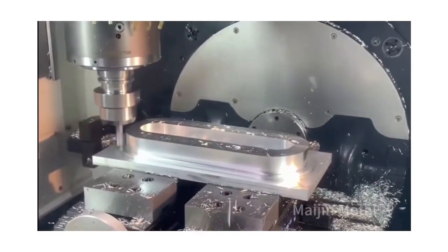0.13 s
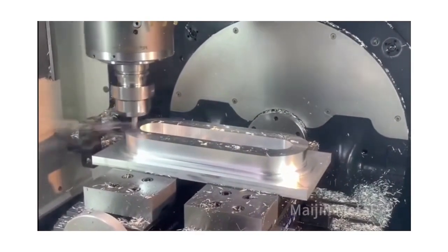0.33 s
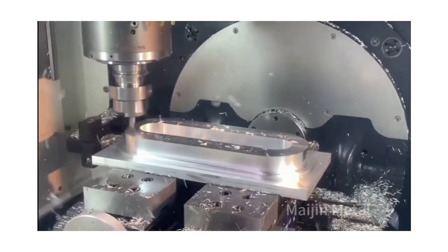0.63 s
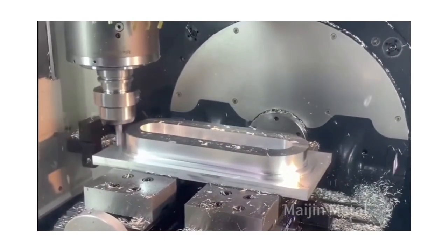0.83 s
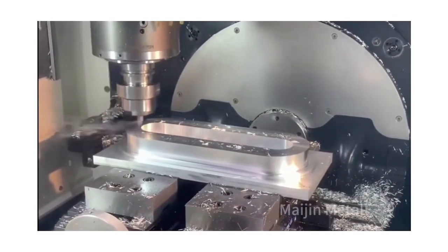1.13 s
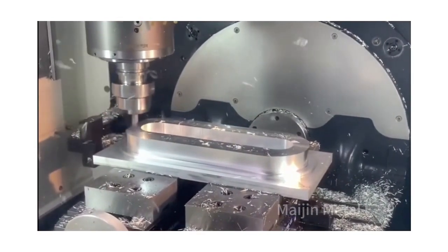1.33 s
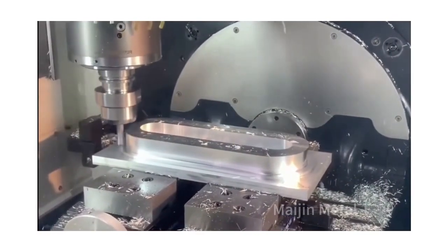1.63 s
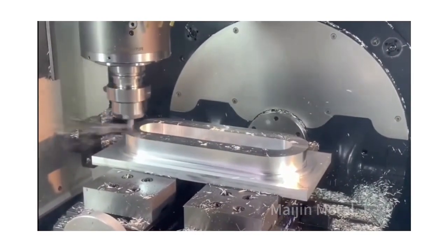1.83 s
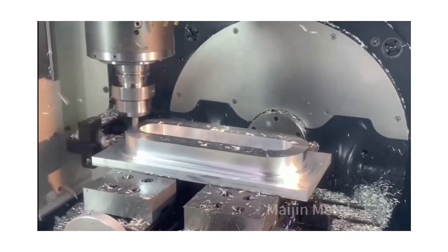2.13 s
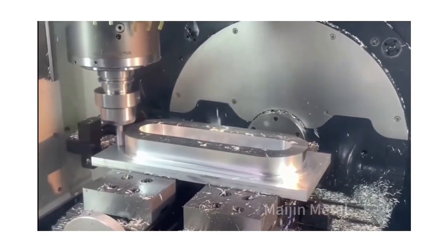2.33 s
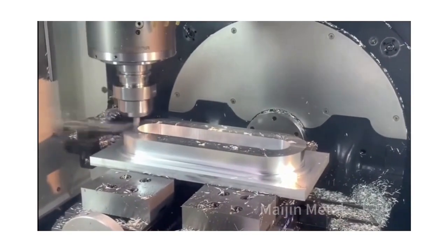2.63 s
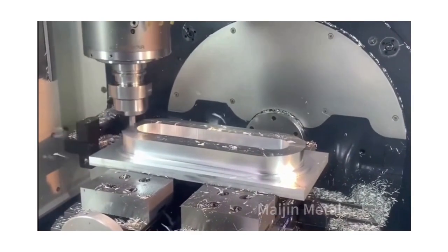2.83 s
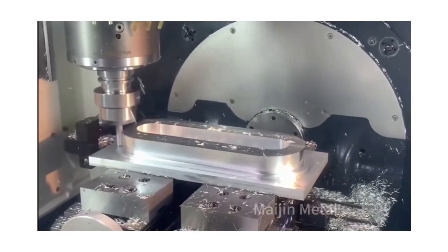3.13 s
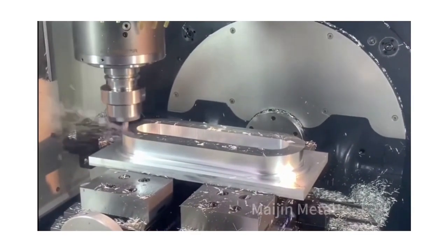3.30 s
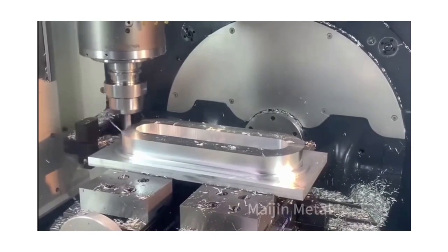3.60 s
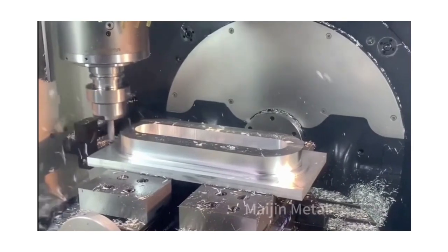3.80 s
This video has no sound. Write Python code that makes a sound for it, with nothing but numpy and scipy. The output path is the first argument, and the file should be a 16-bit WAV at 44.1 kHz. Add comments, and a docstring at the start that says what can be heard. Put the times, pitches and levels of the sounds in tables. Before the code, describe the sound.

A milling cutter makes six short, evenly spaced cuts in an aluminium block, each a high singing tone with a hissing spray of chips. Close by, the spindle hums, air hisses and the machine's enclosure rumbles throughout.

```python
"""At a milling machine's enclosure, a cutter takes six short passes through an aluminium block.
The cabinet rumbles, air hisses, and the spindle (the shaft that spins the cutter) hums. In each pass
the cutter sings on a multiple of the spindle's tone, drags the speed down a little and throws a spray
of metal chips. The drives that move the tool whine, and light chips patter on the walls."""
import sys
import numpy as np
from scipy import signal
from scipy.fft import rfft, irfft, next_fast_len
from scipy.io import wavfile
from scipy.ndimage import uniform_filter1d, map_coordinates

SR = 44100
rng = np.random.default_rng(int(sys.argv[2]) if len(sys.argv) > 2 else 0)


def dump_mix(stems):
    """Bounce the given channels to the path in sys.argv[1] as a 16-bit WAV at rate SR."""
    frames = np.atleast_2d(stems).T  # one column per channel
    limited = np.clip(frames, -1, 1)  # hard clip at full scale
    pcm = np.round(limited * 32767).astype(np.int16)
    wavfile.write(sys.argv[1], SR, pcm)


N = 174636
SPINDLE_HZ = 326.65
# The six passes: (middle [s], singing [dB], length [factor], first touch [dB], leaving ring [dB],
# squeal [dB], change in drive whine [dB])
PASSES = [(.036, -18, 1.06, -50, -37.5, -47, 8), (0.808, -19.7, 1.27, -40, -39, -45, -3.5),
          (1.585, -19.5, 0.995, -35, -43, -43.5, 3), (2.364, -20.3, 1.0, -58, -45, -38.5, 4),
          (3.104, -20.5, 0.9, -63, -42.5, -38, -4), (3.85, -21, 0.89, -50, -43, -37, 3)]


def amp(db):
    """Turn decibels into a gain."""
    return 10 ** (np.asarray(db) / 20)


def unit(x):
    """Scale a signal to an average (rms) strength of 1."""
    return x / np.sqrt(np.mean(x ** 2) + 1e-20)


def along(points, hz):
    """Read between (frequency, value) points on a logarithmic frequency scale."""
    freqs, values = np.transpose(points)
    return np.interp(np.log(hz + 1), np.log(freqs + 1), values)


def clock():
    """The time of each sample in seconds."""
    return np.arange(N) / SR


def swell(middle_s, width_s, steep=2):
    """A bell-shaped rise and fall; a steeper one has a flatter top and ends sooner."""
    return np.exp(-np.abs((clock() - middle_s) / width_s) ** steep)


def wobble(per_s):
    """A smooth curve through per_s random values a second."""
    return map_coordinates(rng.standard_normal(1024), [clock() * per_s], mode="wrap")


def filtered(x, response):
    """Give each frequency in x the gain that response sets for it."""
    size = next_fast_len(N + SR // 2)
    return irfft(rfft(x, size) * response(np.fft.rfftfreq(size, 1 / SR)), size)[..., :N]


def stereo(pair, spectrum):
    """Shape two unrelated signals and mix them to stereo: centred bass, wider treble."""
    # How alike left and right are: (frequency [Hz], likeness [0-1])
    likeness = [(3000, 1), (5500, 1), (8000, 1), (12000, 0.38), (15000, 0.4)]
    angle = lambda hz: np.arccos(np.clip(along(likeness, hz), -1, 1)) / 2
    response = lambda hz: amp(along(spectrum, hz)) * [np.cos(angle(hz)), np.sin(angle(hz))]
    mid, side = filtered(pair, response)
    return unit(np.array([mid + side, mid - side]))


def resonance(hz, width_hz):
    """Noise that rings around one pitch."""
    return unit(filtered(rng.standard_normal(N), lambda f: 1 / (1 + ((f - hz) / width_hz) ** 2)))


def tone(cycles, flutter_db):
    """A sine wave that follows a running count of cycles, fluttering in level and phase."""
    flutter = lambda: 0.87 * wobble(14) + 1.03 * wobble(60)
    unsteady = 1 + np.log(amp(flutter_db)) * (flutter() + 1j * flutter())
    return unit(np.real(unsteady * np.exp(2j * np.pi * (cycles + rng.random()))))


def cabinet():
    """The cabinet rumbles, and its panels boom at their own pitches."""
    # The rumble's colour: (frequency [Hz], relative level [dB])
    spectrum = [(15, -24), (26, -8), (45, .5), (75, -1), (92, -3), (125, 0), (160, -2), (190, .5),
                (220, -6.5), (255, -9.5), (300, -7.5), (345, -9), (400, -14), (480, -15.5), (580, -15.5),
                (750, -23), (1000, -25.5), (1500, -50), (3000, -75)]
    # Panel resonances: (pitch [Hz], half width [Hz], level [dB])
    panels = [(26, 4, -45), (41.2, 2.2, -36), (62.3, 7.2, -35.5), (345.4, 4, -46), (383.4, 4.6, -52.5),
              (814, 25, -57)]
    rumble = unit(filtered(rng.standard_normal(N), lambda hz: amp(along(spectrum, hz))))
    booms = sum(amp(db) * resonance(hz, width) for hz, width, db in panels)
    return amp(-29.8) * rumble + booms


def motor():
    """A motor drones roughly, growing and fading."""
    # The drone's rise and fall: (time [s], relative level [dB])
    levels = [(0.0, -29), (0.05, -23), (0.2, -41), (0.31, -29), (0.46, -36), (0.8, -21.5), (1.2, -41),
              (1.31, -29), (1.62, -26), (2.01, -38.5), (2.14, -22.5), (2.34, -40), (2.49, -25.5),
              (3.0, -24.5), (3.58, -27), (3.68, -20), (3.86, -41.5), (3.94, -23), (3.96, -22)]
    t, hz = clock(), 172.7
    drone = unit(tone(hz * t, flutter_db=1.0) + 0.17 * resonance(hz, width_hz=24))
    return amp(np.interp(t, *np.transpose(levels)) - 3.2) * drone


def bumps():
    """A few dull bumps sound in the cabinet."""
    # Short swells of low noise: (time [s], pitch [Hz], half width [s], level [dB])
    thuds = [(1.08, 440, 0.023, -34), (1.14, 52, 0.028, -27), (2.38, 65.6, 0.074, -21.5),
             (3.12, 65, .05, -27.5), (3.26, 64.4, 0.022, -26.5)]
    return sum(amp(db) * swell(s, width) * resonance(hz, 0.18 * hz) for s, hz, width, db in thuds)


def air():
    """Air hisses at the tool, slightly patchy in pitch and time."""
    # The hiss's colour: (frequency [Hz], relative level [dB])
    spectrum = [(650, -30), (1100, -1), (1500, -4), (1800, -6.5), (2200, -2), (2700, -4), (3300, -5.5),
                (4200, -2), (5600, -3), (7500, -6.5), (8500, -3), (9300, -6), (10400, -8), (11200, -40),
                (12600, -10), (15000, -16.5)]
    level_db, patchy_db = -40.5, 2
    noise_grid = signal.stft(rng.standard_normal((2, N)), nperseg=512)[2]
    patches = uniform_filter1d(rng.standard_normal(noise_grid.shape[1:]), size=5, axis=0)
    patches = unit(uniform_filter1d(patches, size=12, axis=1))
    pair = signal.istft(noise_grid * amp(patchy_db * patches), nperseg=512)[1][:, :N]
    return amp(level_db + 0.53 * wobble(11)) * stereo(pair, spectrum)


def wall_pings():
    """Light chips patter on the walls throughout, each with a brief ring."""
    per_s, centre_hz, fade_60db_s = 160, 4390, 0.1
    out, t = np.zeros(N + SR), np.arange(SR // 16) / SR
    for when, pitch, softness in rng.random((int(per_s * N / SR), 3)):
        hz = centre_hz * 2 ** (2 * pitch - 1)  # up to an octave either way
        db = -53 - 2.5 * np.log(softness + 0.054)
        out[int(when * N):][:len(t)] += amp(db - 60 * t / fade_60db_s) * np.sin(2 * np.pi * hz * t)
    return out[:N]


def spindle_cycles():
    """Count the cycles of the spindle's tone, which slows a little under the load of each pass."""
    wander_hz, sag_hz = 0.22, 1.45
    load = sum(swell(s + 0.015, 0.085 * length) for s, _, length, *_ in PASSES)
    return np.cumsum(SPINDLE_HZ + wander_hz * wobble(6.06) - sag_hz * load) / SR


def spindle_hum(cycles):
    """The spindle hums; the balance of its tones shifts as the tool moves in and as it cuts."""
    # Hum tones: (multiple of the spindle's tone, level [dB], flutter [dB], dip on approach [dB],
    # change in the cut [dB])
    harmonics = [(1, -26.8, .6, 6.5, 0), (2, -38.8, 1.3, 3, 4), (3, -44.8, 1.8, 0, -8), (4, -59, 5, -3, 0),
                 (5, -55, 5, 29, 0), (6, -57.5, 5, 30, 0), (7, -60.5, 3, -1, 0), (8, -62, 3.5, -9, 0),
                 (10, -62.5, 2, -6, 0), (12, -59, 2.5, 3, 0)]
    approach = sum(swell(s - 0.073, 0.09) for s, *_ in PASSES)
    cutting = sum(swell(s + 0.015, 0.11) for s, *_ in PASSES)
    return sum(amp(db - dip * approach + change * cutting) * tone(round(multiple) * cycles, flutter)
               for multiple, db, flutter, dip, change in harmonics)


def feeding():
    """Rises from 0 to 1 and back as the drives push the tool into the block for each pass."""
    return sum(swell(s - 0.027, 0.17, steep=4.2) for s, *_ in PASSES)


def drives():
    """The drives whine thinly, mostly louder while feeding; the strain of each cut shifts the level."""
    # The drives' whines: (pitch [Hz])
    pitches = [9207, 11197, 8879, 9538]
    # Each whine's strength: (idle level [dB], feeding level [dB])
    levels = [(-55.5, -45), (-65.5, -59), (-79, -73), (-66, -71)]
    feed = feeding()
    strain_db = sum(db * swell(s + 0.01, 0.084) for s, *_, db in PASSES)
    return sum(amp(idle + (busy - idle) * feed + strain_db) * tone(hz * clock(), flutter_db=5)
               for hz, (idle, busy) in zip(pitches, levels))


def sizzle():
    """The tool rubs along the metal with a thin, flickering sizzle."""
    # The sizzle's colour: (frequency [Hz], relative level [dB])
    spectrum = [(3000, -50), (11200, -35), (12400, -2), (13800, 3), (15000, -7)]
    level_db = -51 + 3.5 * wobble(25.2)
    return feeding() * amp(level_db) * stereo(rng.standard_normal((2, N)), spectrum)


def tinkle():
    """A dense stream of tiny chips, each ringing briefly at its own pitch."""
    per_s, low_hz, high_hz, fade_60db_s = 900, 3490, 15000, 0.053
    t = np.arange(SR // 64) / SR
    when, pitch, softness = rng.random((int(per_s * N / SR), 3)).T[:, :, None]
    hz = low_hz + (high_hz - low_hz) * pitch
    db = -3 * np.log(softness + 0.02)
    rings = amp(db - 60 * t / fade_60db_s) * np.sin(2 * np.pi * hz * t)
    positions = (when * N).astype(int) + np.arange(len(t))
    return unit(np.bincount(positions.ravel(), rings.ravel(), N)[:N])  # add up overlapping rings


def chip_spray(cycles):
    """Each bite throws a spray: a hiss of shearing metal and ringing chips, pulsing as the cutter turns."""
    # Bursts of chips: (time [s], level [dB])
    bursts = [(.036, -31), (.818, -32.5), (1.578, -31.8), (2.376, -34.5), (3.112, -35), (3.846, -36.5)]
    # The spray's colour: (frequency [Hz], relative level [dB])
    spectrum = [(900, -31), (2000, 0), (3000, -3), (4200, 3.5), (6000, 2), (8300, 4), (10500, -11),
                (12200, 0), (13800, 0), (15000, 0.5)]
    rise_s, fall_s, pulse_depth, flicker_db = 0.032, 0.075, 0.37, 1.2
    flow = sum(amp(db) * np.where(clock() < s, swell(s, rise_s), swell(s, fall_s)) for s, db in bursts)
    rasp = unit((1 + pulse_depth * np.cos(2 * np.pi * cycles)) * amp(flicker_db * wobble(60)))
    hiss = rng.standard_normal((2, N))
    chips = amp(-2.5) * np.array([tinkle(), tinkle()])
    return flow * rasp * stereo(hiss + chips, spectrum)


def squeal(cycles):
    """A rough, high ring flares as the tool comes in and lingers through the cut."""
    multiple = 12
    strength = sum(amp(db) * (swell(s - 0.086, 0.026) + amp(-8) * swell(s, 0.16))
                   for s, *_, db, _ in PASSES)
    ring = tone(multiple * cycles, flutter_db=2.5)
    roughness = 0.46 * resonance(multiple * SPINDLE_HZ, width_hz=34)
    return strength * unit(ring + roughness)


def cutter(cycles):
    """The cutter grazes the block, sings through the cut and rings on as it leaves."""
    # The cutter's tones: (multiple of the spindle's tone, time from mid-pass [s],
    # half width before the pass's length factor [s], level relative to its singing [dB], flutter [dB])
    notes = [(5, 0.0038, 0.077, -1.75, 0.8), (4, 0.013, 0.074, -21.5, 2.5), (6, 0.0051, 0.059, -24.5, 1),
             (7, 0.048, 0.11, -26.5, 3), (8, -0.0049, 0.07, -31, 2.5), (4, -0.14, 0.044, -25.5, 4),
             (5, -.31, .05, -32, 2), (6, 0.14, 0.078, -26.5, 4.5), (12, 0.035, 0.09, -29.5, 3),
             (10, 0.036, 0.067, -33, 3.5), (14, 0.012, .05, -33, 2)]
    singing = np.zeros(N)
    for multiple, offset, width, level, flutter in notes:
        strength = sum(amp(db + level) * swell(s + offset, width * length, steep=2.8)
                       for s, db, length, *_ in PASSES)
        singing += strength * tone(round(multiple) * cycles, flutter)
    graze = sum(amp(touch) * swell(s - 0.13, 0.024) + amp(leave) * swell(s + 0.17, 0.07 * length)
                for s, _, length, touch, leave, *_ in PASSES)
    return singing + graze * tone(5 * cycles, flutter_db=3.0)


def scene():
    """Add up all the sounds; the hum, cutter, squeal and spray follow the same spindle."""
    cycles = spindle_cycles()
    tones = spindle_hum(cycles) + cutter(cycles) + squeal(cycles) + drives()
    enclosure = cabinet() + motor() + bumps() + wall_pings()
    return tones + enclosure + chip_spray(cycles) + sizzle() + air()


def record(dry):
    """Cut off the very highest treble."""
    return filtered(dry, lambda hz: hz < 15350)


dry = scene()
out = record(dry)
dump_mix(out)
```